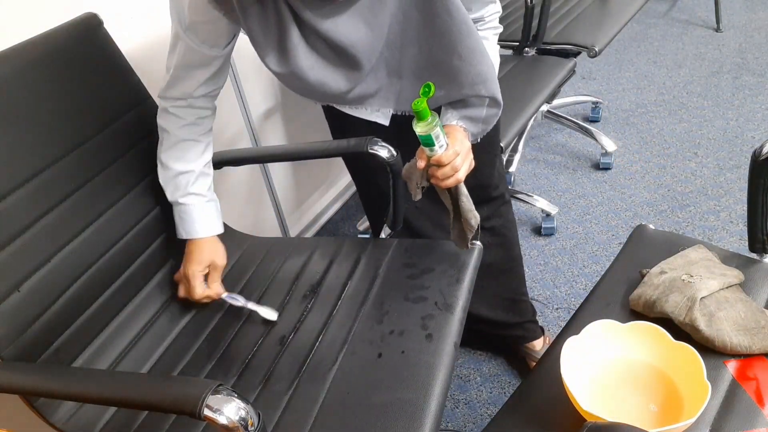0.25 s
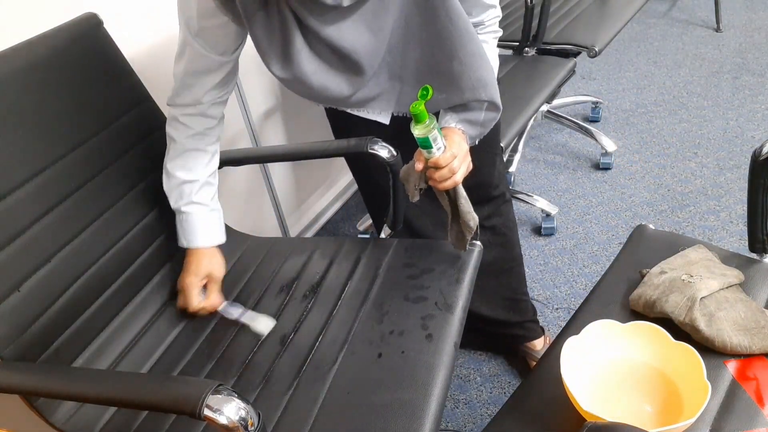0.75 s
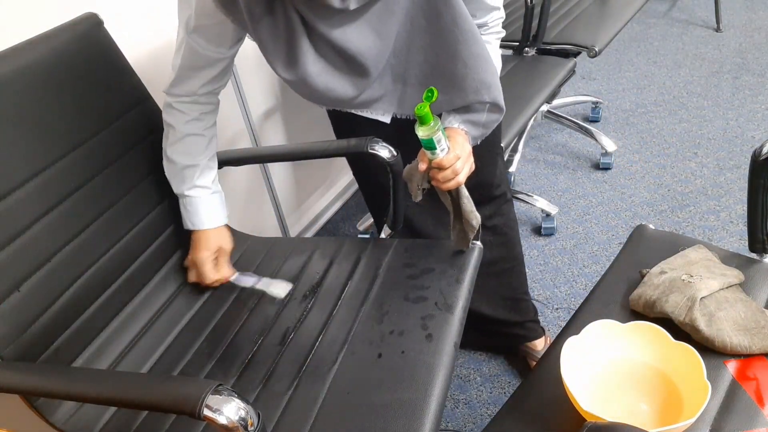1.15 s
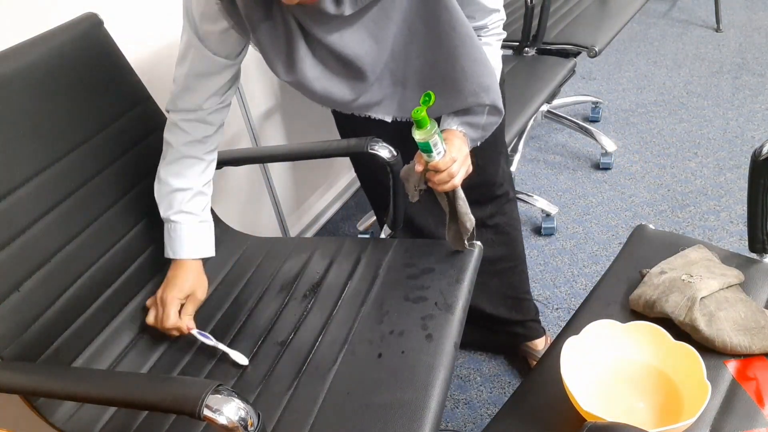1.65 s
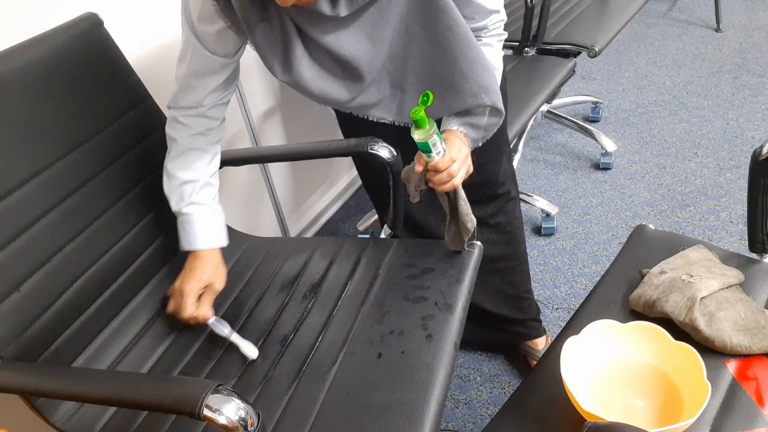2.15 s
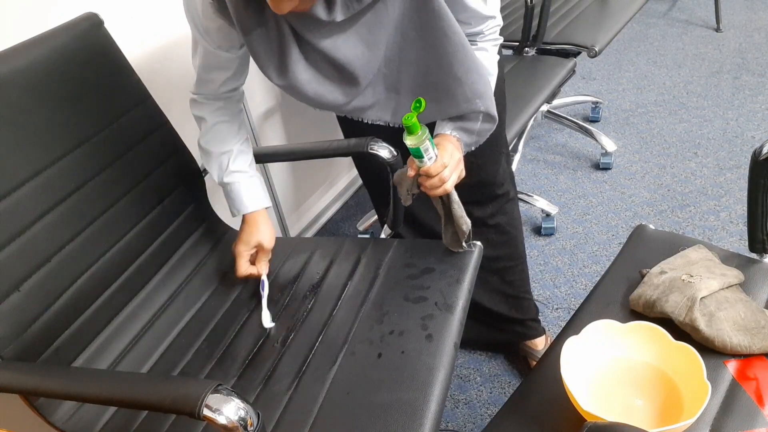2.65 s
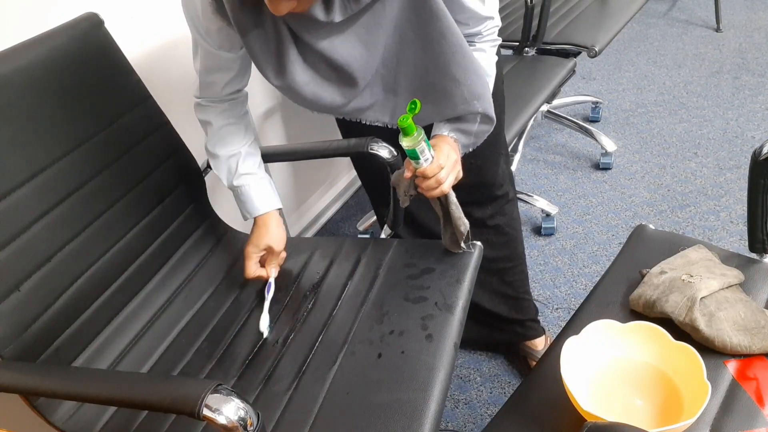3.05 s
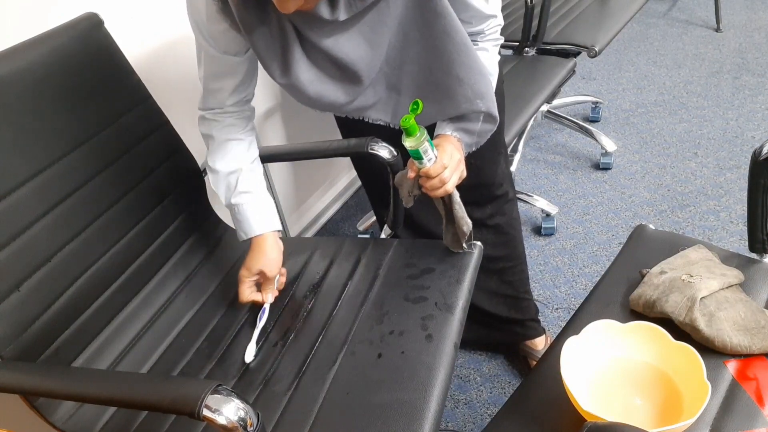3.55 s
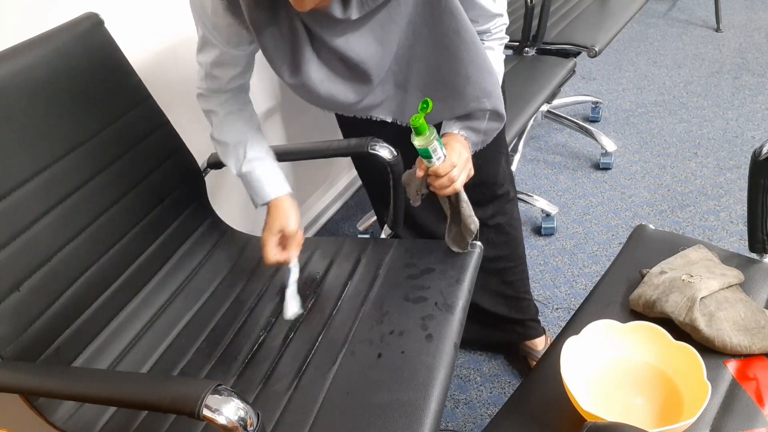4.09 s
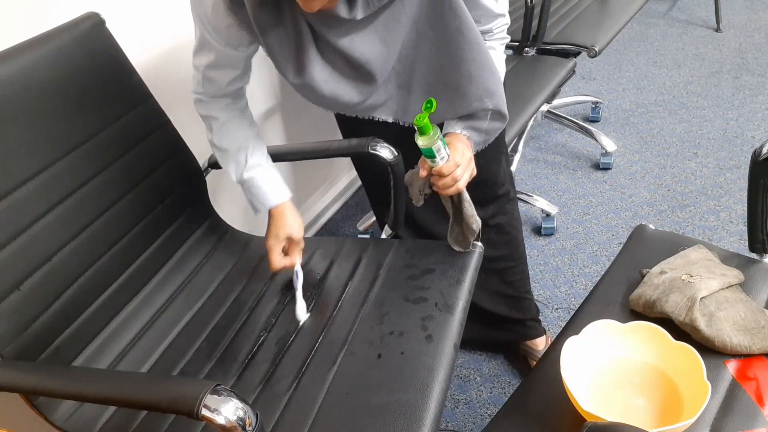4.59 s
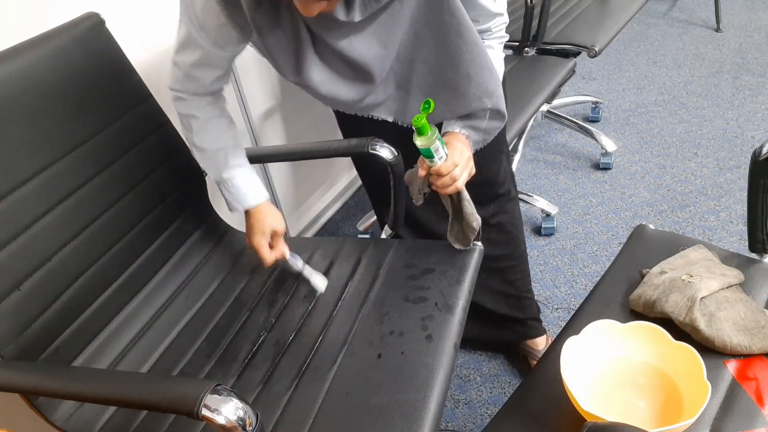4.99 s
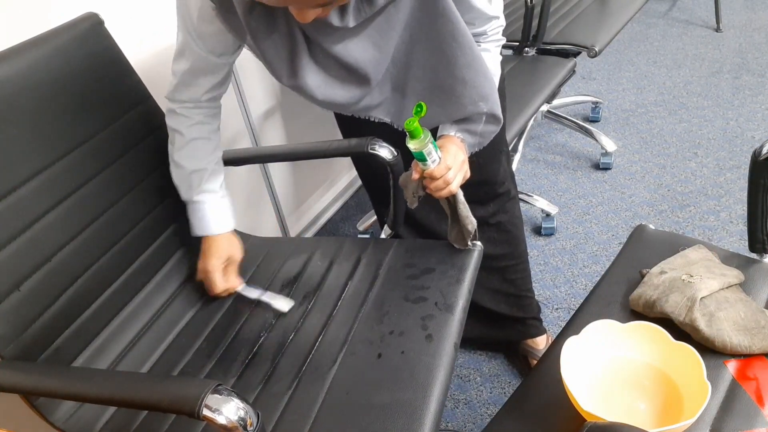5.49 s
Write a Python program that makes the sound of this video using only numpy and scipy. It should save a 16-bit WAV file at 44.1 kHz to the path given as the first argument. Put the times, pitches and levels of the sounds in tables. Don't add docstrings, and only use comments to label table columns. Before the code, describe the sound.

Brisk, close bristle scrubbing on damp leather, crisp and hissy, with dull seat thumps growing stronger partway through in a quiet carpeted room.

```python
import sys
import numpy as np
from scipy import signal
from scipy.fft import rfft, irfft, next_fast_len
from scipy.io import wavfile
from scipy.ndimage import uniform_filter1d

SR = 44100
rng = np.random.default_rng(int(sys.argv[2]) if len(sys.argv) > 2 else 0)


def bounce(signal):
    frames = np.transpose(np.atleast_2d(signal))
    limited = np.clip(frames, -1, 1)
    pcm = np.round(limited * 32767).astype(np.int16)
    wavfile.write(sys.argv[1], SR, pcm)


def undo_db(level):
    steps = np.asarray(level, float) / 20
    return 10 ** steps


N = 252693
T = np.arange(N) / SR
M = next_fast_len(N, True)
HZ = np.fft.rfftfreq(M, 1 / SR)

# f/Hz,
# level/dB
ROOM_AIR = [(15, -27), (30, -4), (70, 8), (205, -3), (500, -19.5), (1700, -25.5), (4500, -32.5),
            (12000, -26.5)]
# f/Hz, share/1
ALIKE = [(60, 0.97), (300, 0.8), (700, 0.61), (1500, 0.46), (2500, 0.51), (7000, 0.57), (10000, 0.32),
         (13000, 0.15)]
# f/Hz, level/dB
LEFT_LOUDER = [(60, 1.5), (500, 0.5), (1500, 2), (3300, 1.5), (4600, 0), (7500, 4.5), (8600, 0), (15000, 0)]

# start t/s, end t/s, fastest level/dB, place of the fastest moment/1
STROKES = [(-0.17, 0.124, -40, 0.01), (0.149, 0.275, -56.5, 0.27), (0.313, 0.503, -46.5, 0.39),
           (0.496, 0.747, -48.5, 0.46), (0.758, 0.991, -44, 0.61), (1.025, 1.157, -48, 0.73),
           (1.18, 1.357, -44.5, 0.47), (1.392, 1.704, -45.5, 0.69), (1.719, 1.952, -46.114, 0.49),
           (1.962, 2.176, -47, 0.51), (2.212, 2.4, -50.5, 0.33), (2.383, 2.546, -56.5, 0.36),
           (2.545, 2.729, -50.5, 0.63), (2.684, 2.906, -55, 0.71), (2.924, 3.096, -50, 0.61),
           (3.078, 3.267, -51, 0.53), (3.286, 3.468, -51, 0.41), (3.41, 3.633, -52.5, 0.53),
           (3.643, 3.809, -48.5, 0.62), (3.772, 3.991, -51, 0.57), (3.993, 4.149, -48, 0.56),
           (4.227, 4.463, -51, 0.48), (4.472, 4.69, -44.5, 0.61), (4.659, 4.855, -46.5, 0.56),
           (4.845, 5.122, -42.5, 0.6), (5.139, 5.269, -47.5, 0.34), (5.237, 5.451, -48, 0.34),
           (5.426, 5.598, -43.5, 0.49), (5.596, 5.81, -45.5, 0.26)]
# skin scrape level/dB, tuft rustle level/dB, fine tips level/dB, digging in along the stroke/dB
TOUCH = [(-11.5, -4, -0.5, 3), (-14, -13, 0.5, -13), (-6.1, -3.5, -2, 2), (-8, -7.5, 3.5, 10),
         (-9, -3.5, 0.2, -7.5), (-7, -10.5, 0, 7), (-7.5, -8.5, 0.4, 10), (-9, -8, 2.5, -4.5),
         (-7.5, -8.8, 1, 16), (-8.5, -12, 2.5, 10), (-7, -5.5, -2, 2), (-13, -12, 0.5, -0.1),
         (-4.5, -6, 2, 9), (-16, -18, 1.5, -14), (-11, -8, 1, 16), (-17, -10.5, -2, -8.8),
         (-8.7, -8.5, 1, 20.0), (-8, -5.5, 0.5, 8), (-9, -7, -0.5, 8), (-14, -10.5, 0.6, -5),
         (-11.6, -7.5, 0.7, 12), (-12, -10, -1.3, 9), (-5, -4.5, -0.4, 1.5), (-8.5, -10.7, -0.9, 5),
         (-6.5, -3.6, -5.5, 4.5), (-17, -10, -3.5, 4.5), (-13, -6, 1, 18), (-10.0, -7.5, -0.5, 8),
         (-11.5, -4.5, 0, 15.5)]
# t/s, length/s, level/dB
SURGES = [
    (.08, 0.015, 3.5),
    (.125, 0.024, -17),
    (.29, 0.023, -1),
    (.545, 0.013, -4.5),
    (1.5, .05, 4.5),
    (1.975, 0.013, -3),
    (3.745, .025, 5),
    (3.83, 0.011, -2.5),
    (4.49, .02, -3.5),
    (4.98, .04, 2.5),
]
# f/Hz, level/dB
HISS = [(3000, -32), (5500, -10.5), (7500, -5.5), (8600, 0), (10300, -3.5), (12000, -6), (15000, -17)]
TIPS = [(8000, -19.5), (10300, -4.5), (12500, -0.5), (14500, -4.5), (15800, -7.5)]
RUSTLE = [(1500, -39), (2600, -8), (3300, -6), (4000, -2), (4600, -5), (5200, -4), (6500, -5), (8000, -7)]
SCRAPE = [(700, -55), (1050, -11), (1200, -2.5), (1400, -3), (1650, 0.5), (2000, -4), (2600, -6.5),
          (3500, -16.5)]

# tight seams level/dB, skin level/dB, panel level/dB, growth along the stroke/dB
SEAT = [(-64, -58.5, -54.5, -3), (-78.5, -78, -68.6, -10), (-60.5, -56.0, -56, -2), (-73, -72, -67.5, -5),
        (-66, -62, -60.5, -11), (-93, -81.5, -76.5, -8.5), (-70.5, -63, -61.5, -8), (-76.9, -74, -70.5, 8),
        (-75.5, -72, -61, 10), (-67.5, -70, -66.5, 7), (-72, -68.5, -62.5, -5), (-75.5, -75.1, -60.5, -10),
        (-56.5, -55.5, -55.5, 6), (-75, -71, -66.5, -12), (-62, -60.2, -58, 9), (-71.5, -66.5, -58, -2),
        (-63, -62, -59.4, 8.1), (-65.5, -61, -58.8, 0.5), (-60.5, -59, -56.5, -5.5),
        (-68.5, -61.5, -55, 0.4), (-61.5, -62.5, -60, -2.7), (-71.5, -67, -59.5, 5),
        (-57.5, -54.5, -57, -15.5), (-70, -64, -59.5, -22), (-58, -55, -53.5, -10.5),
        (-79, -71.5, -58.5, 3), (-83, -70, -58.5, 3), (-73.5, -62, -53, -2), (-71.8, -71, -61, 22)]
LATER_DB = (5, 0.5, 0)
# t/s, length/s, level/dB
KNOCKS = [
    (1.94, 0.051, -61),
    (2.38, 0.026, -61),
    (3.04, .025, -64),
    (4.475, 0.012, -50),
    (5.455, 0.014, -54.5),
]
# f/Hz, width/Hz, level/dB
SEAM = [(614, 74, 0), (700, 29, 1), (768, 39, -1), (892, 54, -2.5), (1006, 69, -1.5), (1207, 55, -6),
        (1386, 50, -5)]
SKIN = [(336.4, 58, 0.5), (378.6, 32.5, 3), (421, 22.6, 0), (526.7, 44, -1)]
PANEL = [(168, 50, -5.5), (205.4, 21.5, 0), (230.4, 18.7, -0.5), (268, 23, -2.5)]
FRAME = [(54, 9.9, -4.5), (94.6, 16.6, 1.5), (124.5, 24.4, -3)]

# t/s, fade/s, f/Hz, level/dB
NUDGES = [
    (.11, 0.033, 119.5, -65),
    (.384, 0.038, 118.8, -50.5),
    (.55, 0.022, 103.9, -63),
    (.85, 0.037, 119.3, -56),
    (1.07, 0.034, 92.5, -64.5),
    (1.21, 0.043, 107, -62.5),
    (1.58, 0.027, 107.5, -65),
    (1.87, 0.071, 104.6, -61),
    (2.07, 0.06, 118.7, -65),
]
# t/s, fade/s, f/Hz, level/dB
JOLTS = [(2.43, 0.023, 98.7, -55.5), (2.606, 0.047, 98.2, -53.5), (2.796, 0.025, 99.6, -53.7),
         (2.896, 0.027, 101.4, -48), (2.953, 0.019, 105.8, -47), (3.031, 0.047, 102.5, -47),
         (3.152, 0.047, 100.5, -53), (3.253, 0.023, 114.2, -52), (3.365, 0.043, 99.3, -48),
         (3.561, 0.061, 95.0, -49.3), (3.74, 0.078, 95.2, -46), (3.864, 0.012, 100.3, -45),
         (3.939, 0.048, 99.16, -50), (4.068, 0.032, 100.0, -48.5), (4.183, 0.036, 96.85, -46),
         (4.297, 0.044, 98.5, -43.5), (4.402, 0.024, 98.34, -42.5), (4.508, 0.055, 96.0, -50.5),
         (4.681, 0.097, 93.0, -45.5), (4.88, 0.063, 94.05, -47.5), (5.047, 0.048, 95.35, -47),
         (5.178, 0.038, 101.3, -48.5), (5.337, 0.059, 108.0, -56.3), (5.459, 0.015, 117.2, -47.5),
         (5.533, 0.055, 96.95, -51.5), (5.687, 0.027, 108.0, -46.9)]
# t/s, peak level/dB, centre f/Hz, fade/s
SNAPS = [(0.154, -61, 9020, 0.004), (0.3275, -34.5, 8320, 0.0052), (0.519, -52, 11600, 0.0032),
         (0.773, -55, 12760, 0.004), (1.034, -47, 11840, 0.0039), (1.1944, -46, 10200, 0.0035),
         (1.7355, -51, 10900, 0.0038), (1.992, -64, 11800, 0.004), (2.572, -47, 8720, 0.0037),
         (3.844, -46, 10830, 0.0049), (4.692, -43, 10990, 0.0041), (5.1652, -50, 9700, 0.0042),
         (5.449, -30.5, 11840, 0.0047)]

RISE, FALL = 1.13, 2.29
CREEP_DB, CREEP_S = -17.5, 0.12
STICK_S, STICK_DB = 0.019, -5
SLIP_S, SLIP_DB = 0.012, 3.5
FLICKS_PER_S, FLICK_SPREAD_DB = 30000, 2
RUSTLE_DIG = 0.11
PANEL_SHARE_DB = -14.5
QUICKER_RISE, REST_DB = 1.23, -74
HUM_HZ, HUM_DB = 198, -74
ROOM_AIR_DB = -66
LEFT_LAG_S = 6.0e-5
NEAR_T60_S, NEAR_DB = 0.018, -7
TAIL_T60_S, TAIL_DB = 0.056, -8.5
TOP_HZ = 15830


def unit(x):
    return x / np.sqrt(np.mean(x ** 2))


def smooth(x, length_s):
    return uniform_filter1d(x, int(length_s * SR))


def on_log_axis(points):
    hz, value = np.transpose(points)
    return np.interp(np.log(HZ + 1), np.log(hz), value)


def walk(rate):
    hold = int(SR / rate)
    steps = np.repeat(rng.standard_normal(N // hold + 1), hold)
    return 1.605 * uniform_filter1d(steps, hold)[:N]


def swells(table):
    return [(np.exp(-((T - s) / length) ** 2), db) for s, length, db in table]


def ports(make, response):
    alike = on_log_axis(ALIKE)
    lag = np.array([np.exp(-2j * np.pi * HZ * LEFT_LAG_S), np.ones(len(HZ))])
    common = rfft(make(), M) * lag
    own = rfft(np.array([make(), make()]), M)
    shade = undo_db(np.outer([0.5, -0.5], on_log_axis(LEFT_LOUDER)))
    mixed = np.sqrt(alike) * common + np.sqrt(1 - alike) * own
    return unit(irfft(response * shade * mixed, M)[:, :N])


def room_air():
    air = ports(lambda: rng.standard_normal(N), undo_db(on_log_axis(ROOM_AIR)))
    hum = np.sqrt(2) * np.sin(2 * np.pi * HUM_HZ * T) * undo_db(HUM_DB + 1.7 * walk(2.43))
    return air * undo_db(ROOM_AIR_DB + 0.24 * walk(4.4)) + hum


def motion():
    power, stroke, past = np.zeros(N), np.zeros(N, int), np.zeros(N)
    for k, (start, end, top_db, lean) in enumerate(STROKES):
        span = slice(int(max(start, 0) * SR), int(end * SR))
        u = (T[span] - start) / (end - start)
        swing = np.clip(np.minimum(u / lean, (1 - u) / (1 - lean)), 0, 1)
        speed = np.sin(np.pi / 2 * swing) ** np.where(u < lean, RISE, FALL)
        push = (undo_db(top_db) * speed) ** 2
        leads = span.start + np.argmax(push >= power[span])
        power[span] += push
        stroke[leads:] = k
        past[leads:] = np.minimum((T[leads:] - start) / (end - start), 1) - lean
    power += undo_db(CREEP_DB) ** 2 * np.abs(smooth(power, CREEP_S)) + undo_db(-78) ** 2
    for snap in SNAPS:
        since = T - snap[0]
        stick = STICK_DB * np.exp(-(since / STICK_S) ** 2)
        slip = SLIP_DB * np.exp(-np.abs(since) / SLIP_S)
        power *= undo_db(np.where(since < 0, stick, slip)) ** 2
    surge_db = sum(bell * db for bell, db in swells(SURGES))
    return smooth(power, 0.0043) * undo_db(surge_db) ** 2, stroke, past


def flicks(busy, spread_db):
    share = np.clip(busy * FLICKS_PER_S / SR, 0.08, 1)
    size = rng.standard_normal(N) * undo_db(spread_db * rng.standard_normal(N))
    return unit(size) * (rng.random(N) < share) / np.sqrt(share)


def brush():
    power, stroke, past = motion()
    scrape_db, rustle_db, tips_db, dig_db = np.array(TOUCH)[stroke].T
    scrape_db = scrape_db + past * dig_db
    rustle_db = rustle_db + past * dig_db * RUSTLE_DIG
    speed = np.sqrt(power / power.max())
    # colour, level/dB, patchiness/dB, how much more steeply than the hiss it grows with speed
    layers = ((HISS, np.full(N, -4.5), 0.8, 0.01),
              (TIPS, tips_db - 4.0, 0.8, 0.05),
              (RUSTLE, rustle_db - 2.0, 1.5, -0.05),
              (SCRAPE, scrape_db - 2.5, 1.8, 0.05))
    out = 0
    for colour, db, patchy_db, steep in layers:
        sound = ports(lambda: flicks(speed, FLICK_SPREAD_DB), undo_db(on_log_axis(colour)))
        out = out + sound * speed ** steep * undo_db(smooth(db, 0.075) + patchy_db * walk(30))
    return out * np.sqrt(power) * undo_db(0.81 * walk(70))


def modes(table):
    total = 0
    for k, (f, width, db) in enumerate(table):
        drag = 1j * HZ * width
        total = total + (-1) ** k * undo_db(db) * drag / (f * f - HZ ** 2 + drag)
    return total


def shaken(body, busy, held_s):
    ring = ports(lambda: flicks(busy, 3.6), modes(body))
    swing = smooth(smooth(np.mean(ring ** 2, axis=0), held_s), held_s)
    return ring / np.sqrt(swing + 0.047)


def rocking():
    s, fade_s, hz, db = np.vstack([NUDGES, JOLTS]).T
    power = undo_db(REST_DB) ** 2
    for at, fade, push_db in zip(s, fade_s, db):
        u = (T - at) / fade
        power = power + undo_db(push_db) ** 2 * np.exp(-(u * np.where(u < 0, QUICKER_RISE, 1)) ** 2)
    return np.sqrt(power), np.interp(T, s, hz)


def seat():
    power, stroke, past = motion()
    *levels, growth_db = np.array(SEAT)[stroke].T
    seam_db, skin_db, panel_db = levels + past * (growth_db + np.array(LATER_DB)[:, None])
    moving = np.clip(np.sqrt(power) / undo_db(np.array(STROKES)[stroke, 2] - 3.5), 0, 1)
    knock = sum(bell * undo_db(db) for bell, db in swells(KNOCKS))
    panel_rattle = np.hypot(knock, undo_db(PANEL_SHARE_DB) * rocking()[0])
    # body, level/dB, density of slips, swing held/s, how closely it follows the brush, rattle
    bodies = ((SEAM, seam_db, 0.06, 0.03, 0.9, undo_db(-17.0) * knock),
              (SKIN, skin_db, 0.05, 0.04, 0.8, undo_db(-7) * knock),
              (PANEL, panel_db, 0.1, 0.05, 0.45, panel_rattle))
    out = 0
    for body, db, busy, held_s, follows, rattle in bodies:
        size = np.hypot(undo_db(smooth(db, 0.041)) * moving ** follows, rattle)
        out = out + shaken(body, busy, held_s) * size
    return out


def frame():
    size, hz = rocking()
    phase = 2 * np.pi * np.cumsum(hz * (1 + 0.02 * walk(30))) / SR
    swing = np.sqrt(2) * np.sin(phase) * undo_db(np.array([[-0.9], [-2.1]]))
    shudder = undo_db(-4.0) * shaken(FRAME, 0.1, 0.038)
    return (swing + shudder) * size * undo_db(1.0 + 0.77 * walk(19))


def snaps():
    length = 2048
    out, age = np.zeros((2, N + length)), np.arange(length) / SR
    for s, db, hz, fade_s in SNAPS:
        burst = rng.standard_normal((2, length)) * np.exp(-age / fade_s)
        band = [0.36 * hz, min(4.8 * hz, 0.45 * SR)]
        sos = signal.butter(1, band, "bandpass", fs=SR, output="sos")
        start = int(s * SR)
        out[:, start:start + length] += undo_db(db - 12.0) * signal.sosfilt(sos, burst)
    return out[:, :N]


def echoes(x, t60_s, db, after_s):
    age = np.arange(int(t60_s * SR)) / SR
    tail = rng.standard_normal((2, len(age))) * undo_db(-60 * age / t60_s) * (age > after_s)
    tail *= undo_db(db) / np.sqrt(np.sum(tail ** 2, axis=1, keepdims=True))
    return signal.fftconvolve(x, tail, axes=1)[:, :x.shape[1]]


def scene():
    air = room_air()
    near = brush() + snaps()
    turns = (np.array(STROKES)[1:, 0] * SR).astype(int)
    parts = np.split(near, turns, axis=1)
    chair = np.hstack([echoes(part, NEAR_T60_S, NEAR_DB, 0.0005) for part in parts])
    room = echoes(near, TAIL_T60_S, TAIL_DB, 0.003)
    return near + chair + room + seat() + frame() + air


def band_limit(x):
    return signal.sosfilt(signal.butter(12, 16510, fs=SR, output="sos"), x)


def record(dry):
    mix = irfft(rfft(dry, M) * (HZ < TOP_HZ), M)[:, :N]
    return band_limit(mix)


dry = scene()
out = record(dry)
bounce(out)
```